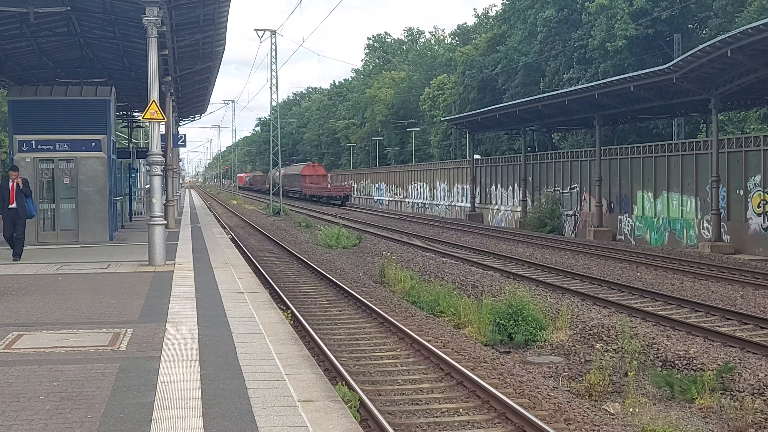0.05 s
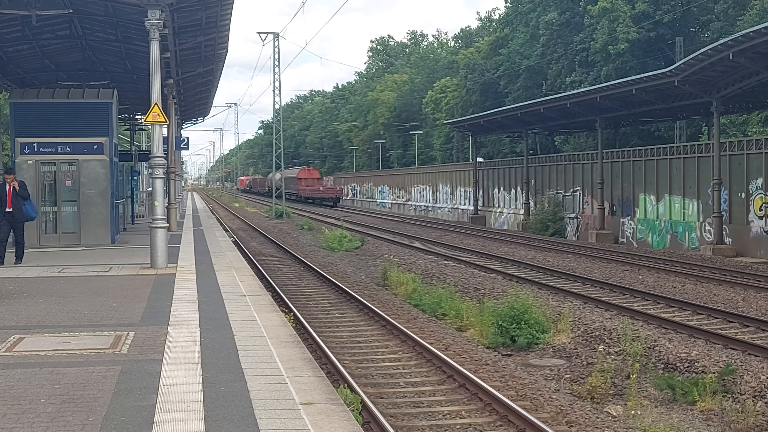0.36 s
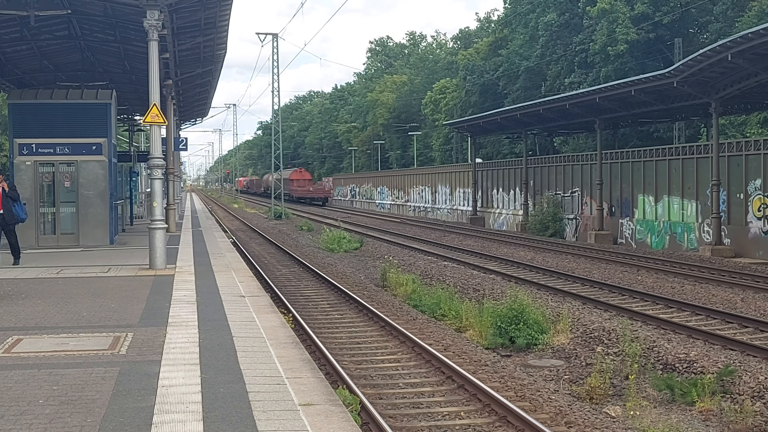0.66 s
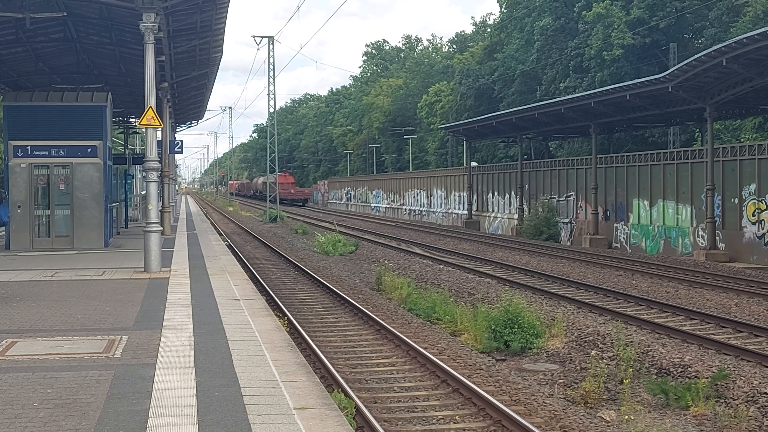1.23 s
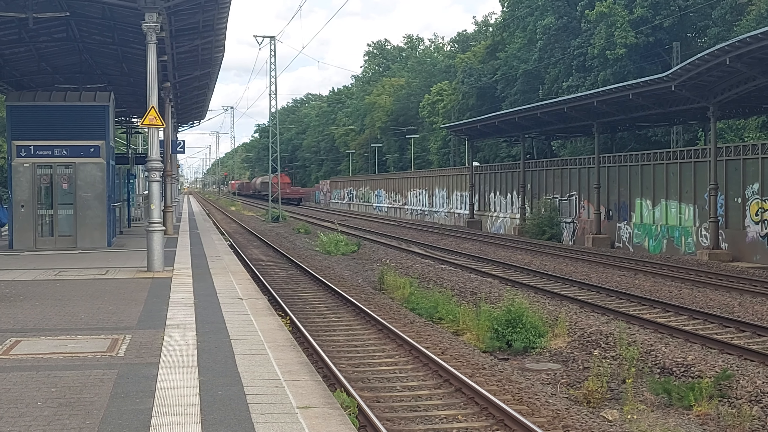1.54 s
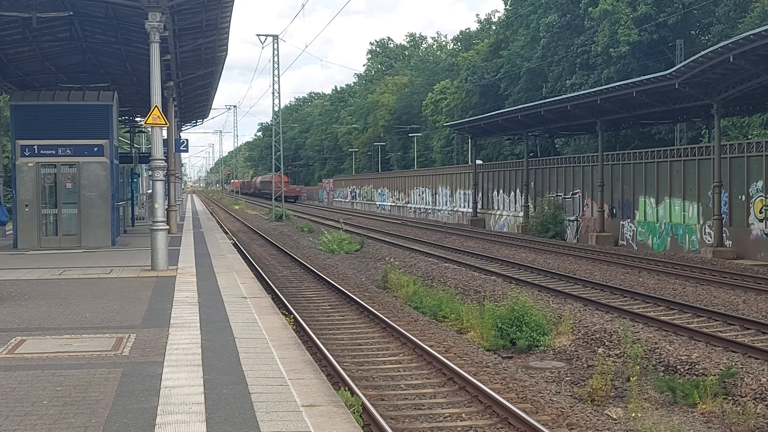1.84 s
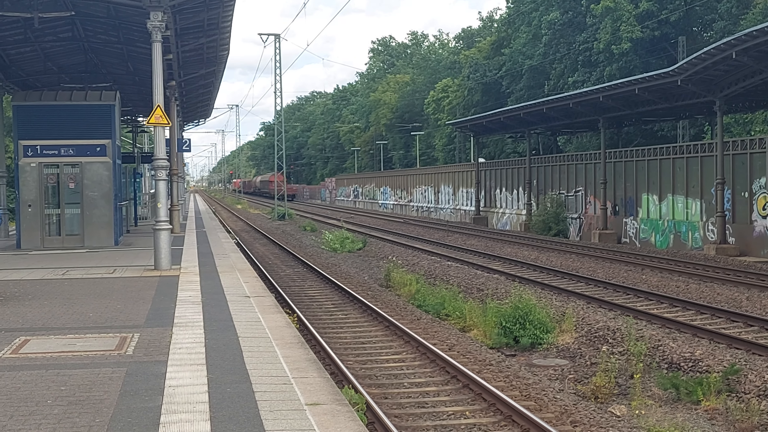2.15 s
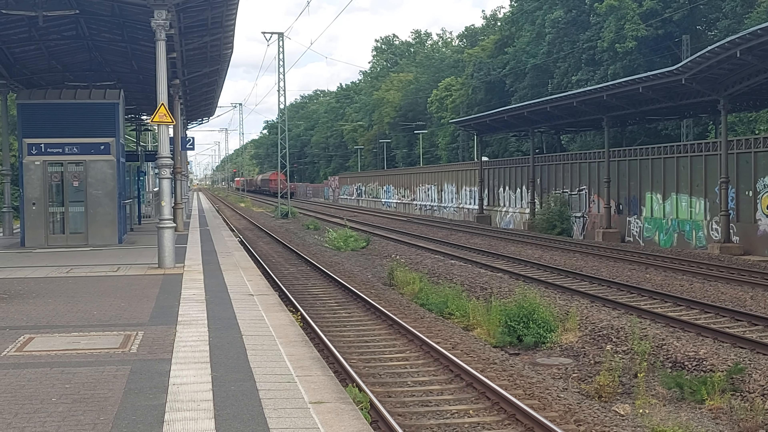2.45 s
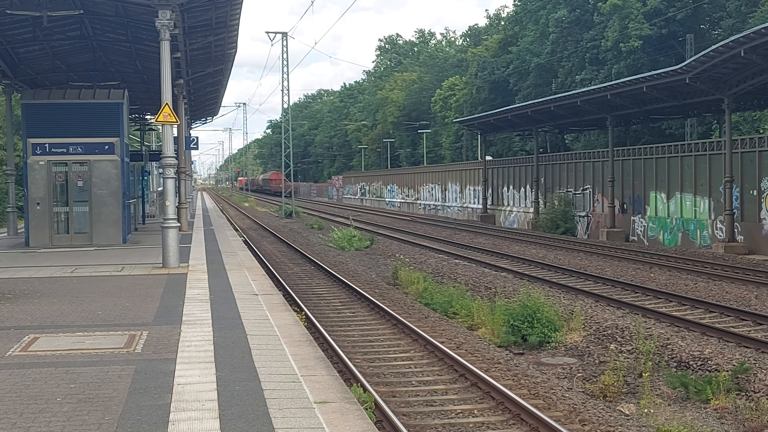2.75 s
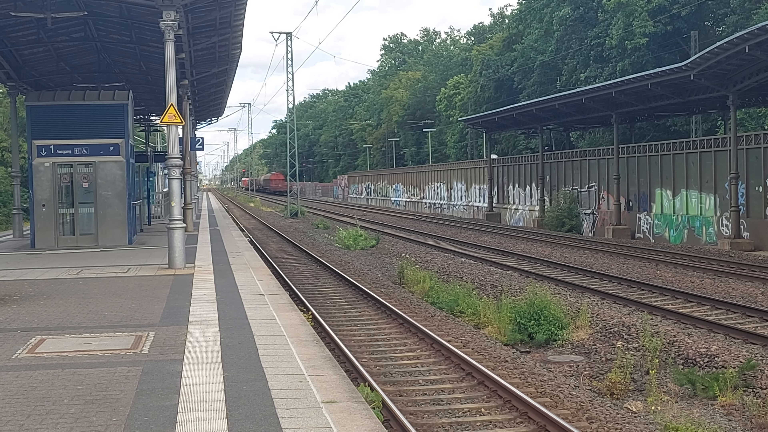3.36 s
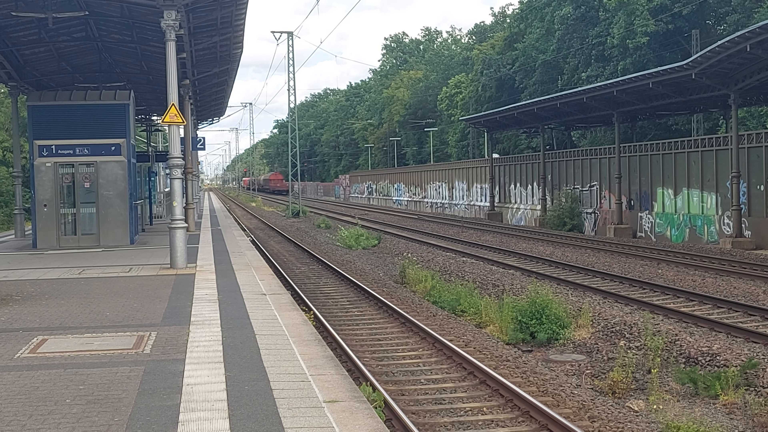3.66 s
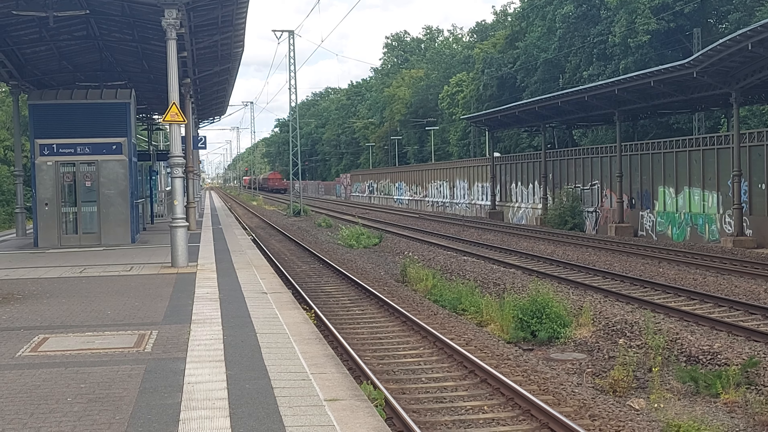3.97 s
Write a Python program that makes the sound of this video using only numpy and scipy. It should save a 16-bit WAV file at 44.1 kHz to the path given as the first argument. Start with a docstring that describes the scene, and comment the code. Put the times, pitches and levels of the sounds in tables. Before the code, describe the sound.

A freight train rolls away from a station platform, its wheels roaring, ringing and knocking quickly with a thin hiss. As it fades, gusts of wind build on the microphone, rumbling, thudding and crackling.

```python
"""A freight train rolls away, heard from a station platform through a microphone with two ports.
Wheels and rails roar, ring and hiss, and two flat-spotted wheels knock once a turn, fainter and duller
with distance; now and then a rubbing wheel sings. Right at the microphone, gusts of wind build up
and buffet the ports, rumbling and thudding, and crackling at their strongest."""
import sys
import numpy as np
from scipy import signal
from scipy.fft import rfft, irfft
from scipy.io import wavfile

SR = 44100
rng = np.random.default_rng(int(sys.argv[2]) if len(sys.argv) > 2 else 0)


def wav_out(sig):
    """Save sig, one row per channel (or a flat mono array), as 16-bit PCM at SR to the path in sys.argv[1]."""
    wavfile.write(sys.argv[1], SR, np.round(np.clip(np.atleast_2d(sig).T, -1, 1) * 32767).astype(np.int16))


N = 176400
TIME_S = np.arange(N) / SR
FREQ_HZ = np.maximum(np.arange(N // 2 + 1) * SR / N, 1)
TURN_S = .1112  # one turn of a wheel
PORT_LAG_S = .00007  # the left port hears the train first


def undb(db):
    """Decibels to gain."""
    return 10 ** (np.asarray(db) / 20)


def unit(x):
    """Scale to rms 1."""
    return x / np.sqrt(np.mean(x ** 2))


def curve(rows):
    """Join (time_s, value) rows by straight lines."""
    return np.interp(TIME_S, *np.array(rows, float).T)


def swell(at, half_width_s):
    """A smooth rise and fall around a moment, with peak 1."""
    return np.exp(-np.minimum(((TIME_S - at) / half_width_s) ** 2, 50))


def shape(rows):
    """Gain per frequency, with rms 1, from (freq_hz, relative_db) rows."""
    hz, db = np.array(rows, float).T
    return unit(undb(np.interp(np.log(FREQ_HZ), np.log(hz), db)))


def resonances(rows):
    """Gain per frequency of steep resonances; each row's level is the rms it takes from white noise."""
    peaks = (undb(db) * unit(1 / (1 + ((FREQ_HZ - hz) / width) ** 2)) for hz, width, db in rows)
    return np.sqrt(sum(peak ** 2 for peak in peaks))


def filtered(x, gain):
    """Apply a gain per frequency."""
    return irfft(rfft(x) * gain, N)


def walk(rate_hz, channels=1):
    """Smooth random wandering with spread 1, up to about rate_hz changes a second."""
    real, imag = rng.standard_normal((2, channels, 8000))
    hz = np.arange(real.shape[1]) * SR / N
    return unit(irfft((real + 1j * imag) * np.exp(-(hz / rate_hz) ** 2), N))


def octaves(x):
    """Split into overlapping octave bands that sum to the whole: (centre_hz, band) pairs."""
    centres = 2. ** np.arange(6, 15)
    gains = [np.interp(np.log(FREQ_HZ), np.log(centres), row) for row in np.eye(len(centres))]
    return [(hz, filtered(x, gain)) for hz, gain in zip(centres, gains)]


# echoes in the train's sound on the platform: freq_hz, power_share
PLATFORM_ECHOES = [(500, 0.16), (1300, 0.24), (2300, .27), (3300, 0.98), (3900, 0.63), (4700, 0.27),
                   (5900, 0.85), (7000, 0.9)]
def from_track(force, gain):
    """A random force on steel reaches both ports directly, and as echoes off roof and wall."""
    direct, left, right = rfft(rng.standard_normal((3, N)) * force) * gain
    hz, share = np.array(PLATFORM_ECHOES).T
    echo_share = np.interp(np.log(FREQ_HZ), np.log(hz), share)
    lagged = direct * np.exp(-2j * np.pi * FREQ_HZ * PORT_LAG_S)
    echoes = np.sqrt(echo_share) * np.array([left, right])
    return irfft(np.sqrt(1 - echo_share) * np.array([direct, lagged]) + echoes, N)


# roar of wheels on rails, close by: freq_hz, relative_db
ROAR_SPECTRUM = [(30, -11), (60, -1), (130, -3), (300, -18), (400, -1), (500, -1.5), (730, -9.5),
                 (900, -6.5), (1100, -15), (1260, -4), (1400, -2.5), (1530, -17.5), (1780, -15),
                 (1980, -13.5), (2230, -11.5), (2600, -16.5), (2950, -22.5), (3900, -24.5), (4900, -22.5),
                 (6400, -31.5), (7300, -31.5), (8400, -44.5), (10500, -50.5), (15500, -51.5)]
# ringing of wheels and wagons, close by: pitch_hz, half_width_hz, level_db
RING_MODES = [(388.6, 9.8, -42.5), (1307, 70, -47), (1770, 13, -53), (1840, 42, -54), (2227, 32, -52.5),
              (2249, 15, -50), (2690, 67, -57), (3080, 14, -67.5), (3090, 8.8, -57.5), (3420, 9.9, -63),
              (3520, 18, -65), (3820, 13, -70), (4840, 25, -71.5), (5215, 14, -69)]
def rolling(roar_db=-32.5, pulse_db=.5, pulse_peak_s=.074, waver_s=.00018):
    """Rough treads roar on the rails and keep the wheels ringing; the ring swells once a turn."""
    roar = from_track(undb(roar_db + 1.3 * walk(23)), shape(ROAR_SPECTRUM))
    ring = from_track(undb(2.5 * walk(27)), resonances(RING_MODES))
    heard_s = TIME_S + waver_s * walk(2.94)[0]  # the path to the microphone wanders in length
    pulse = undb(pulse_db * np.cos(2 * np.pi * (TIME_S - pulse_peak_s) / TURN_S))
    return roar + pulse * np.array([np.interp(heard_s, TIME_S, port) for port in ring])


# steel struck by a wheel flat: pitch_hz, half_width_hz, relative_db
RATTLE_MODES = [(474, 120, -0.5), (950, 83, -6), (1216, 47, -2), (1315, 100, 0.5), (1777, 96, 0),
                (2144, 120, -4), (2570, 98, -6.5), (3190, 190, -13.5), (4730, 400, -15.5)]
def rattle(knocks, decay_s, tilt_db_per_octave, rise_s=.0036):
    """Each knock sets off a short rattle in the wheel and wagon."""
    force = np.zeros(N)
    for at, db in knocks:
        on = (TIME_S > at) & (TIME_S < at + 2 * TURN_S)
        age_s = TIME_S[on] - at
        force[on] += undb(db) * np.minimum(age_s / rise_s, 1) * np.exp(-age_s / decay_s)
    steel = resonances(RATTLE_MODES) * undb(tilt_db_per_octave * np.log2(FREQ_HZ / 1000))
    return from_track(force * undb(1.53 * walk(120)), unit(steel))


# knocks while the wheel is near, before the loss with distance: start_s, level_db
NEAR_KNOCKS = [(.058, -24), (.172, -27.5), (.283, -25.5), (.389, -24.5), (.501, -27.5), (.612, -29.5),
               (.726, -28.5), (.838, -29.5), (.944, -27.5), (1.062, -29), (1.168, -27), (1.283, -28),
               (1.398, -30), (1.505, -27), (1.617, -29), (1.727, -28), (1.835, -24.5)]
def wheel_flats(far_db=-30, second_lead_s=.1, second_softer_db=6):
    """Two flat spots strike the rail, each once a turn; farther off the knocks go on evenly."""
    far_starts = np.arange(NEAR_KNOCKS[-1][0] + TURN_S, N / SR, TURN_S)
    first = list(NEAR_KNOCKS) + [(at, far_db) for at in far_starts]
    second = [(at - second_lead_s, db - second_softer_db) for at, db in first]
    return (rattle(first, decay_s=.034, tilt_db_per_octave=-.5)
            + rattle(second, decay_s=.0745, tilt_db_per_octave=-4))


# the train drawing away from the platform: time_s, gain_db
DISTANCE_FADE = [(0, -0.5), (.45, -2), (1.05, -2.5), (1.45, -4), (1.85, -7), (2.15, -10.5), (2.8, -11.5),
                 (3.3, -15.5), (3.65, -16), (4, -16)]
def recede(train, extra_loss_per_octave=.11):
    """The train fades with distance, faster above 2 kHz."""
    fade_db = curve(DISTANCE_FADE)
    return sum(band * undb(fade_db * (1 + extra_loss_per_octave * max(np.log2(hz / 2000), 0)))
               for hz, band in octaves(train))


# colour of the hiss from the track: freq_hz, relative_db
HISS_SPECTRUM = [(7000, -26.5), (9100, -18.5), (9600, -15.5), (10200, -20), (12300, -11), (13000, -2),
                 (13800, -7.5), (15600, -15)]
# the hiss as heard from the platform: time_s, level_db
HISS_FADE = [(0, -58), (.8, -63.5), (.98, -59), (1.1, -61.5), (1.45, -59.5), (1.6, -64.5), (1.8, -63),
             (2.02, -68.5), (2.6, -72.5), (2.8, -77), (3.0, -77), (3.15, -77.5), (3.45, -87), (3.62, -78.5),
             (4, -84)]
# brief lifts in the hiss: peak_s, added_db
HISS_LIFTS = [(.32, 1), (2.16, 3), (2.36, 2), (2.54, 2), (2.64, 2), (2.97, 5)]
def steel_hiss():
    """Steel on steel gives a thin hiss that sinks as the train leaves."""
    lifts_db = sum(db * swell(at, half_width_s=.04) for at, db in HISS_LIFTS)
    return from_track(undb(curve(HISS_FADE) + lifts_db + .8 * walk(15)), shape(HISS_SPECTRUM))


# puffs of wind reaching the microphone: start_s, length_s, level_db
WIND_PUFFS = [(0.135, 0.016, -24.5), (0.591, 0.023, -22.5), (0.834, 0.032, -25), (0.93, 0.13, -34.5),
              (1.367, 0.051, -25), (1.494, 0.16, -28), (1.662, 0.07, -27), (1.73, 0.02, -41),
              (1.804, 0.056, -22), (1.875, 0.027, -21), (1.905, 0.023, -16.5), (1.936, 0.056, -20.5),
              (2.009, 0.043, -18.5), (2.028, 0.17, -17.5), (2.098, 0.018, -15), (2.2, 0.044, -24),
              (2.287, 0.11, -18.5), (2.402, 0.063, -26.5), (2.507, 0.087, -17.5), (2.611, 0.096, -16.5),
              (2.706, 0.096, -22.5), (2.751, 0.03, -14.5), (2.808, 0.046, -16), (2.865, 0.089, -16),
              (2.894, 0.7, -22), (2.93, 0.061, -14.5), (3.003, 0.15, -13), (3.15, 0.058, -13.5),
              (3.218, 0.068, -13.5), (3.305, 0.087, -14), (3.408, 0.089, -14), (3.499, 0.06, -15),
              (3.584, 0.17, -26), (3.684, 0.048, -19.5), (3.772, 0.083, -21), (3.867, 0.11, -22),
              (3.974, 0.025, -15)]
def gust_db(rise_s=.0048, fall_s=.009, breeze_db=-36):
    """Strength of the wind: puffs that rise, hold and fall, over a light breeze."""
    t = TIME_S[::32]
    power = undb(breeze_db) ** 2
    for at, length, db in WIND_PUFFS:
        rise = (1 + np.tanh((t - at) / rise_s)) / 2
        fall = (1 - np.tanh((t - at - length) / fall_s)) / 2
        power += (undb(db) * rise * fall) ** 2
    return curve(np.c_[t, 10 * np.log10(power)])


# flutter on the ports at full gust: freq_hz, relative_db
FLUTTER_SPECTRUM = [(30, -23), (60, -10.5), (110, -9.5), (190, -7), (290, 0.5), (420, -1.5), (620, -6.5),
                    (850, -13), (1200, -22.5), (2000, -35.5), (3200, -52.5), (6000, -67.5), (10000, -88),
                    (16000, -85)]
def wind_flutter(full_gust_db=-10, trim_db=-3, growth_per_octave=.33):
    """Eddies hit each port separately; stronger gusts are louder and brighter."""
    relative_db = gust_db() - full_gust_db
    eddies = unit(rng.standard_normal((2, N)) * undb(2.7 * walk(330, channels=2) + 2.18 * walk(38)))
    flutter = sum(band * undb(relative_db * (1 + growth_per_octave * np.clip(np.log2(hz / 300), -1, 2)))
                  for hz, band in octaves(filtered(eddies, shape(FLUTTER_SPECTRUM))))
    return flutter * undb(full_gust_db + trim_db)


# deep wind noise on the ports: freq_hz, relative_db
RUMBLE_SPECTRUM = [(15, -30), (30, -18.5), (48, -4.5), (80, 0), (125, 0), (190, -5), (300, -8.5),
                   (600, -38.5), (1500, -80.5)]
# the unbroken bed of rumble: time_s, level_db
RUMBLE_BED = [(0, -47), (.33, -38), (.43, -28), (1.05, -28.5), (1.15, -32.5), (1.43, -35.5), (1.65, -32.5),
              (1.85, -22.5), (2.0, -30.5), (2.22, -27), (2.27, -37), (2.35, -28.5), (2.72, -32.5),
              (2.82, -38), (2.92, -32), (3.2, -28), (3.5, -29), (3.7, -39), (4, -35.5)]
# deep buffets on the microphone: peak_s, level_db
WIND_BUFFETS = [(.6, -29), (.865, -23), (1.0, -25), (1.065, -28), (1.755, -25.5), (1.868, -17.5),
                (2.115, -20), (2.36, -28), (2.64, -18), (2.77, -26.5), (3.09, -24.5)]
def wind_rumble():
    """Wind rumbles on each port and surges with every buffet."""
    noise = filtered(rng.standard_normal((2, N)), shape(RUMBLE_SPECTRUM))
    rumble = unit(noise * undb(4.1 * walk(20, channels=2)))
    buffet_power = sum((undb(db) * swell(at, half_width_s=.022)) ** 2 for at, db in WIND_BUFFETS)
    return rumble * np.sqrt(undb(curve(RUMBLE_BED)) ** 2 + buffet_power)


# a wheel singing out down the track: peak_s, level_db
WHEEL_SINGS = [(.075, -35), (.122, -31), (.19, -36), (.288, -31), (0.717, -32.5), (0.936, -29.5),
               (1.04, -32.5), (1.149, -33), (1.19, -39), (1.254, -30.5), (1.288, -33), (3.634, -40.5),
               (3.746, -39.5), (3.854, -43)]
def singing_wheel(pitch_hz=1330, waver_share=.0149):
    """A rubbing wheel rings up and dies away, wavering in pitch."""
    wavering_hz = pitch_hz * (1 + waver_share * walk(63)[0])
    envelope = sum(undb(db) * swell(at, half_width_s=.0094) for at, db in WHEEL_SINGS)
    tone = unit(np.sin(2 * np.pi * np.cumsum(wavering_hz) / SR)) * envelope
    return np.array([tone, np.interp(TIME_S - PORT_LAG_S, TIME_S, tone)])


# soft bumps of air on the microphone: centre_s, half_width_s, peak_db
AIR_BUMPS = [(0.143, .0012, -18.5), (0.723, 0.00099, -16), (0.844, 0.0018, -29), (1.513, 0.0011, -13),
             (1.564, 0.0015, -14), (1.598, 0.001, -16.5), (1.739, 0.00084, -12.5), (2.105, 0.0017, -10),
             (2.367, 0.0021, -23), (2.672, 0.001, -9), (3.096, 0.0016, -11)]
def wind_bumps(crossing_s=.00077):
    """A large eddy sweeps over one port, then the other: one swing of pressure down and up."""
    swing = np.zeros(N)
    for at, half_width, db in AIR_BUMPS:
        position = (TIME_S - at) / half_width
        swing += undb(db) * position * np.exp((1 - position ** 2) / 2)
    return np.array([swing, np.interp(TIME_S - crossing_s, TIME_S, swing)])


# an eddy landing on a port: freq_hz, relative_db
THUD_SPECTRUM = [(40, -15), (150, -0.5), (380, 4.5), (700, -4.5), (1200, -25.5), (2500, -42), (6000, -73.5),
                 (16000, -89)]
# the eddy breaking up: freq_hz, relative_db
CRACKLE_SPECTRUM = [(100, -30), (400, -8), (1000, 6.5), (1600, -3), (2500, -16), (4000, -32), (7000, -42),
                    (10000, -51), (16000, -52.5)]
# eddies slapping the microphone: peak_s, half_width_s, thud_db, crackle_db
EDDY_SLAPS = [(1.879, 0.0035, -14.5, -57), (1.922, 0.0059, -16, -58), (2.064, 0.0062, -18, -31.5),
              (2.099, 0.0073, -14, -48.5), (2.168, .005, -16.5, -46), (2.31, 0.0047, -15.5, -36),
              (2.379, .0042, -10, -48), (2.528, 0.0039, -10, -42), (2.677, 0.0055, -11.5, -35),
              (2.773, 0.0059, -24.5, -39), (2.906, 0.0034, -21.5, -40.5), (2.946, .016, -13, -33),
              (2.974, 0.0037, -26.5, -27), (3.018, 0.002, -14, -20), (3.037, .006, -21, -29.5),
              (3.079, .0009, -16.5, -18.5), (3.098, 0.008, -21, -25.5), (3.117, 0.00095, -18, -22),
              (3.158, .0017, -17.5, -23.5), (3.178, .003, -5.5, -32.5), (3.193, 0.0043, -21.5, -27),
              (3.25, .003, -27.5, -31.5), (3.257, 0.0037, -12.5, -17.5), (3.268, 0.0039, -11.5, -21),
              (3.279, .002, -25.5, -26), (3.303, .0007, -24, -22), (3.331, 0.0035, -14.5, -41.5),
              (3.375, 0.011, -21, -31), (3.452, 0.0021, -17.5, -42), (3.533, 0.007, -20, -37.5),
              (3.79, 0.0076, -18, -37.5)]
def wind_slaps():
    """The hardest eddies thud on the ports and break up in a short crackle."""
    thud_level, crackle_level = np.zeros((2, N))
    for at, half_width, thud_db, crackle_db in EDDY_SLAPS:
        push = swell(at, half_width)
        thud_level += push * undb(thud_db)
        crackle_level += push * undb(crackle_db)
    grains = unit(rng.standard_normal((2, N)) * undb(2.5 * walk(900, channels=2)))
    thuds = filtered(rng.standard_normal((2, N)) * thud_level, shape(THUD_SPECTRUM))
    return thuds + filtered(grains * crackle_level, shape(CRACKLE_SPECTRUM))


def scene():
    """From the platform: the train drawing away, behind the wind on the microphone."""
    train = recede(rolling() + wheel_flats()) + steel_hiss() + singing_wheel()
    return train + wind_flutter() + wind_rumble() + wind_bumps() + wind_slaps()


def record(dry):
    """The recorder rounds the highest peaks and cuts the top."""
    top_hz = 15750
    return signal.sosfilt(signal.ellip(10, .2, 80, top_hz, fs=SR, output="sos"), np.tanh(dry))


dry = scene()
out = record(dry)
wav_out(out)
```